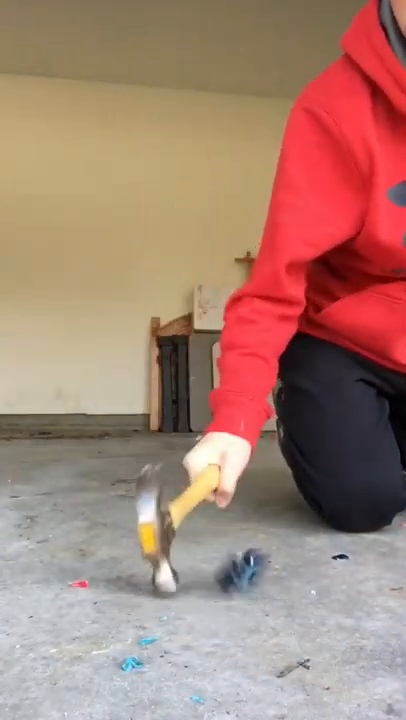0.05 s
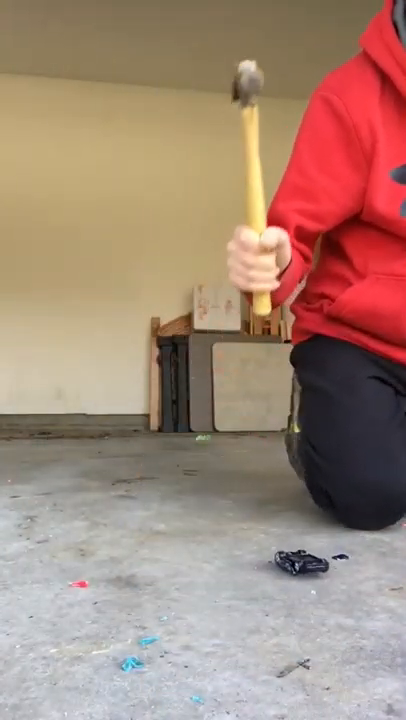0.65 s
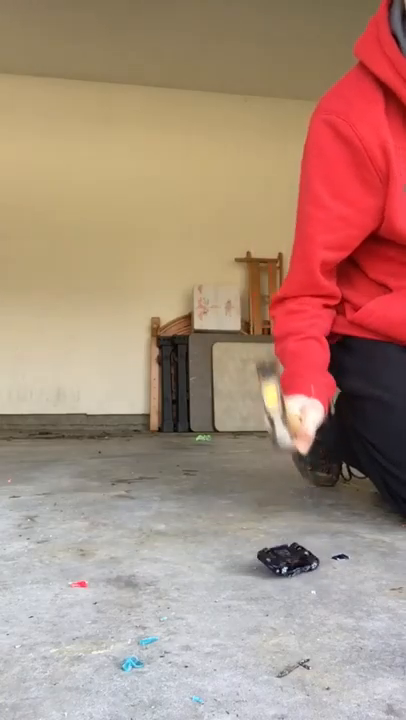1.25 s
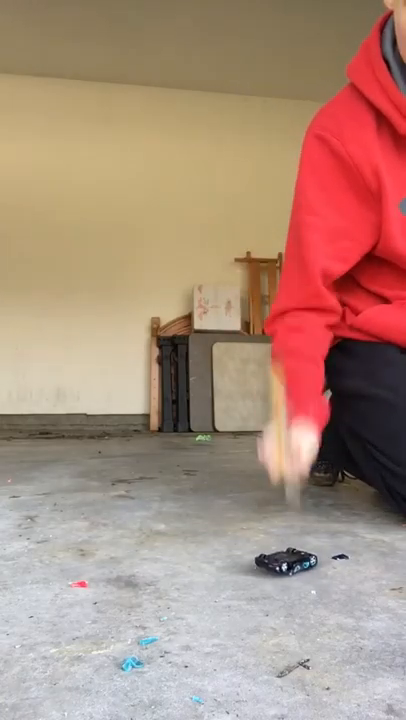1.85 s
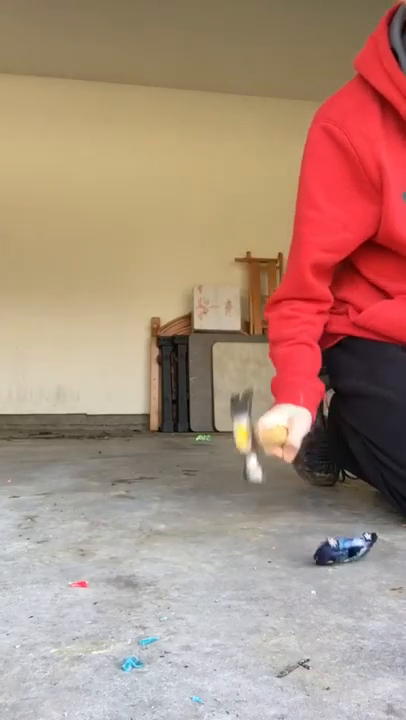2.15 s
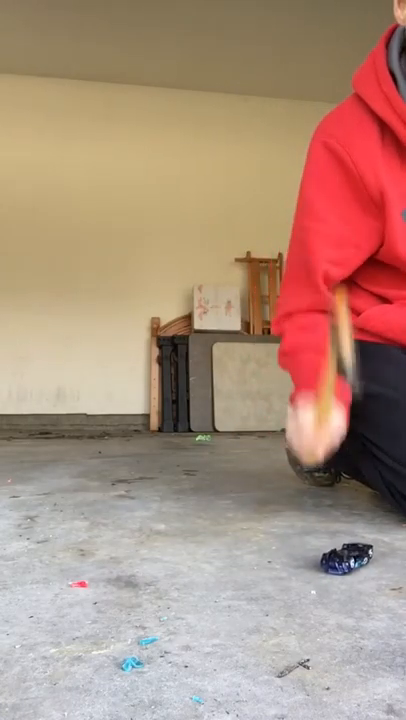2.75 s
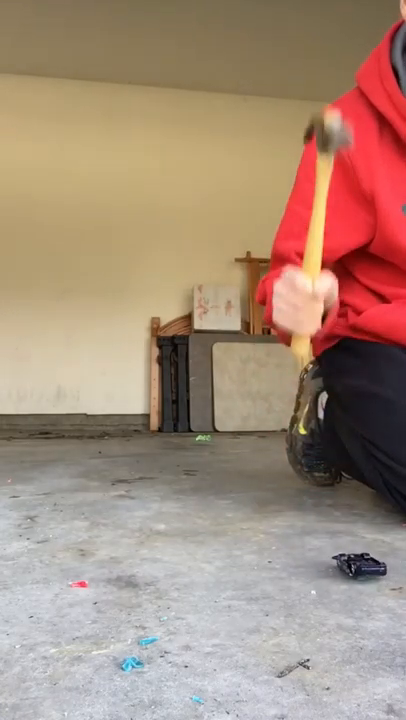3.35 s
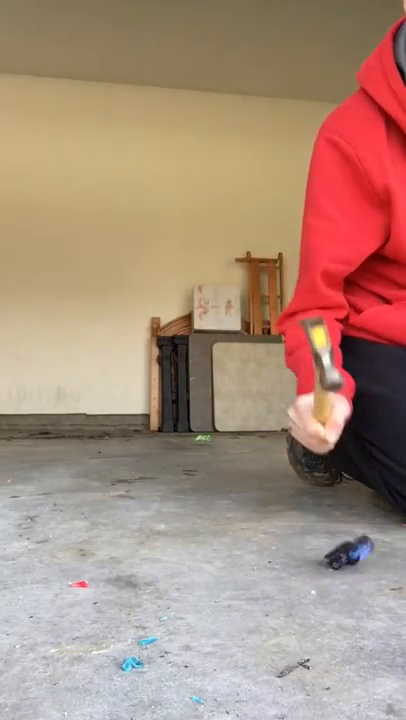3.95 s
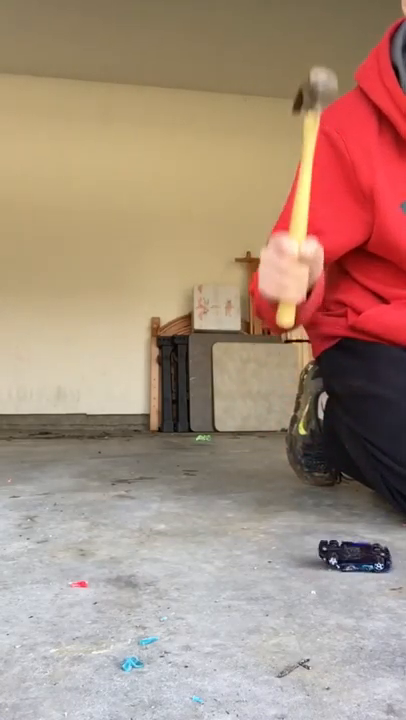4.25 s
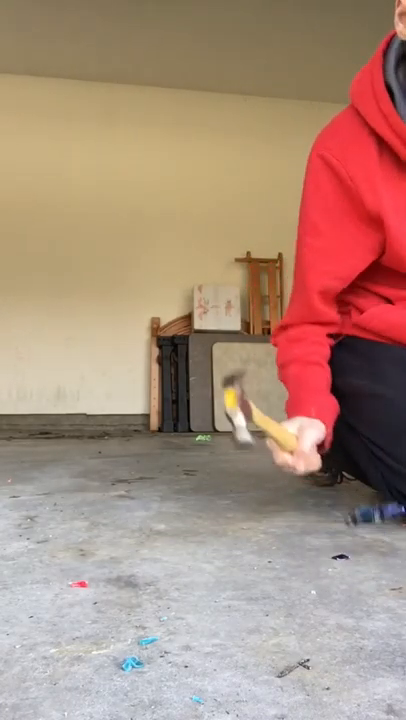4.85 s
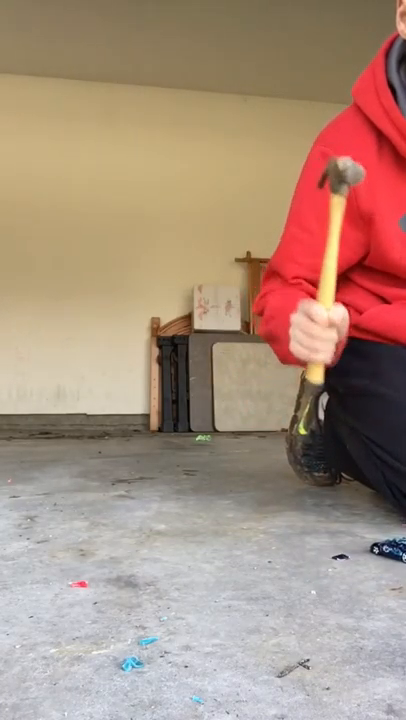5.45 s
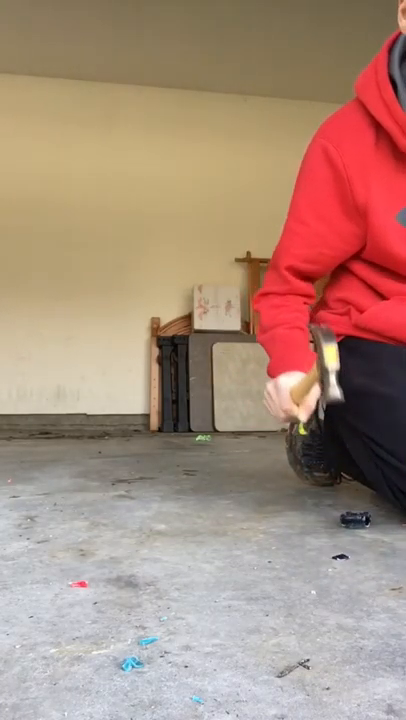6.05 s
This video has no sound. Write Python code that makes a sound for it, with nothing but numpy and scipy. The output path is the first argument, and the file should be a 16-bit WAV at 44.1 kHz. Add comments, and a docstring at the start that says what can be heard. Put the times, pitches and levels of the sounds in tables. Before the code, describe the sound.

A hammer smashes a small metal toy car on concrete about once a second, the car clattering after each blow in an echoing garage.

```python
"""A claw hammer smashes a die-cast toy car on a concrete garage floor, about one blow a second.
Each blow cracks twice as the shell gives way, throws splinters and thumps the slab; the car leaps,
lands and rattles to rest. The bare garage booms and rings on. Behind it, a sleeve rustles and a
faint rumble comes through the open door. Heard in mono on a phone close by, which limits the peaks."""
import sys
import numpy as np
from scipy import signal
from scipy.fft import rfft, irfft, next_fast_len
from scipy.io import wavfile
from scipy.ndimage import uniform_filter1d, minimum_filter1d

SR = 44100
rng = np.random.default_rng(int(sys.argv[2]) if len(sys.argv) > 2 else 0)


def unload_audio(sound):
    """Save the sound as a 16-bit wav file, at the path given as the first command line argument."""
    columns = np.transpose(np.atleast_2d(sound))
    # keep every value between -1 and 1, then stretch to whole-number steps
    steps = np.round(np.clip(columns, -1, 1) * 32767)
    wavfile.write(sys.argv[1], SR, steps.astype(np.int16))


N = 272979

# distant outdoor rumble and air: (frequency [Hz], relative level [dB])
OUTDOOR_SPECTRUM = [(12, -54), (20, -38), (51, -3), (71, 0), (140, -7.5), (166, -13.5), (387, -24.5),
                    (1300, -34.5), (1540, -28), (1990, -30.5), (2430, -33.5), (4390, -32.5), (4910, -34),
                    (17000, -55)]
# standing waves of the garage: (frequency [Hz], relative level [dB], t60 [s])
ROOM_MODES = [(55, -5.5, .35), (85, -8.5, 0.61), (122, -2.5, 0.19), (157.4, 2, 1), (236.8, -5.5, 0.9),
              (274, -17.5, 0.41), (368, -5.5, 0.92), (534, -4.5, 0.27)]
# colour of the diffuse tail: (frequency [Hz], gain [dB])
TAIL_SPECTRUM = [(40, 1), (120, 8), (300, 0), (700, -1), (1500, -5.5), (4000, -7), (8000, -6), (16000, -5)]
# late decay of that tail: (frequency [Hz], t60 [s])
TAIL_DECAY = [(60, 0.21), (160, 0.72), (400, 0.93), (1100, 1.404), (2000, 1.07), (4000, 0.83), (8000, 0.65),
              (15000, 0.42)]
# first reflections off the body, ceiling and walls: (delay [s], gain [dB])
REFLECTIONS = [(.0088, -47.5), (.0183, -40.5), (0.0296, -25), (0.039, -23.5)]
# a sleeve on the swinging arm: (time [s], length [s], level [dB], starting lag of its reflection [s])
SLEEVE_SWINGS = [(3.494, 0.96, -63.5, 0.00022), (4.607, 0.54, -62, 0.00064), (5.578, 0.41, -71, 0.00015)]
# the kneeling body shifts: (time [s], level [dB])
KNEE_BUMPS = [(0.914, -34.5), (0.966, -38.5)]
# metal striking concrete: (frequency [Hz], gain [dB])
CRACK_SPECTRUM = [(150, -16), (700, -15.5), (1500, -14), (2300, -8.5), (3200, 0), (4500, -0.5),
                  (6200, -1.5), (8000, -8), (10500, -12.5), (15000, -13), (18000, -24.5)]
# the car's struck shell: (frequency [Hz], relative level [dB], t60 [s])
SHELL_MODES = [(1376, -20.5, 0.056), (2680, -18, 0.069), (3035, -6, .035), (3150, -13, .03),
               (4230, -8, .03), (4480, -2.5, 0.045), (4580, -5, 0.0094), (5550, 6, 0.0092),
               (6395, -6, 0.027), (6200, -11, .018), (7200, -17, .025), (7320, -1.5, 0.022),
               (7900, -3.5, 0.013), (8860, 3, 0.0074), (11500, -12.5, 0.029)]
# the chassis, fainter and longer: (frequency [Hz], relative level [dB], t60 [s])
CHASSIS_MODES = [(2870, -8.5, .25), (4450, -2, 0.25), (4680, -3, .22), (5370, 1.5, .18), (5860, -5, 0.22)]
# the bent shell ringing in flight: (frequency [Hz], relative level [dB], t60 [s])
FLIGHT_MODES = [(5207, 0, 1.1), (6222, -5, .8)]
# thin parts of the car ring on: (time [s], frequency [Hz], level [dB], t60 [s])
SHIMMERS = [(-0.03, 3280, -23.5, 0.42), (1.443, 7700, -43.5, 0.4), (1.975, 6470, -34.5, 0.53),
            (2.8455, 7850, -58, 0.22), (3.875, 3560, -18, 0.85), (4.61, 7560, -43, 0.45),
            (5.744, 2060, -20.5, 0.087), (6.04, 7000, -38, 0.46)]
# the car lands on a corner: (time [s], level [dB], ring [Hz], treble [dB])
CAR_LANDINGS = [(.0412, -21.5, 3140, -8.5), (.1316, -27.5, 4240, -6.5), (.145, -11.5, 5220, -12),
                (0.2281, -24, 6080, -20.5), (0.2552, -19, 5910, -11.5), (.275, -24, 4540, -2),
                (.344, -26, 5110, -14.5), (0.3683, -12.5, 5330, -15), (.455, -22.5, 6040, -3.5),
                (0.4783, -29.5, 4620, -18), (0.5264, -28.5, 4540, -14.5), (0.586, -32, 5380, -8.5),
                (0.6645, -37, 4500, -15.5), (1.1377, -24.5, 4510, -4), (1.3081, -18, 4590, -7.5),
                (1.335, -27.5, 4410, -9.5), (1.4422, -29.5, 4450, -4.5), (1.565, -40, 4660, -11),
                (2.2761, -18, 4350, -13.5), (2.312, -24, 4290, -1), (2.3953, -22.5, 4700, -12.5),
                (2.4377, -33, 4580, 0.5), (2.4717, -33, 4740, -4.5), (2.613, -48, 4550, -9.5),
                (2.7017, -48.5, 4520, -21), (2.8453, -42.5, 4540, -9), (3.234, -24, 4480, -9.5),
                (3.3447, -39, 4690, -12.5), (4.0192, -24, 4520, 2), (4.034, -22.5, 3700, 4),
                (4.2043, -23.5, 5400, 5), (4.2125, -22.5, 5290, 0), (4.269, -25, 4430, -16),
                (4.344, -29, 4320, -5), (4.4455, -35.5, 4420, -16.5), (4.48, -36, 5220, -11.5),
                (4.612, -36, 7530, 2), (4.7102, -50.5, 4280, -16), (5.016, -14, 5120, -4.5),
                (5.0286, -15, 4260, 4), (5.0669, -18.5, 4510, 0.5), (5.1388, -26, 3640, 3),
                (5.1747, -29, 7560, 10), (5.875, -19.5, 4510, -8), (5.951, -24.5, 4600, -5),
                (5.9625, -26.5, 4090, 3), (6.0407, -24.5, 4280, -12), (6.067, -30.5, 4450, -6)]
# the car's loose wheels and edges chatter as it tumbles, in the air or along the floor:
# (time [s], length [s], first tick [dB], chatter [dB])
CAR_TUMBLES = [(.198, 0.088, -39, -37.5), (0.423, 0.24, -41, -60), (.764, .04, -59.5, -54),
               (1.522, .17, -39.5, -66.5), (2.143, .04, -27.5, -44.5), (2.294, 0.074, -29.5, -41),
               (2.402, 0.14, -34.5, -59), (3.077, .06, -22.5, -46), (3.311, .03, -39, -56.5),
               (4.191, 0.06, -31, -41), (4.293, 0.13, -35, -51), (4.49, .11, -36, -53.5),
               (5.112, 0.091, -26.5, -42), (5.943, .22, -31, -51)]
# the hammer's handle and head: (frequency [Hz], relative level [dB], t60 [s])
HAMMER_MODES = [(565, -9.5, 0.011), (1670, 2, 0.0077), (1910, 0.5, 0.0072), (4000, -9, .012)]
# the hammer clips the leaping car: (time [s], knock [dB], ring [dB], time in the air [s])
GLANCING_HITS = [(3.0395, -15.5, -31, 0.18)]
# the slab heaves under the hammer: (frequency [Hz], relative level [dB], decay time [s])
SLAB_MODES = [(56, -12, .07), (92, 0.5, 0.037)]
# hammer blows, levels before the mix: (time [s], crack [dB], ring [Hz], handle [dB], treble [dB],
# delay until the shell bottoms out [s], second crack [dB], thump [dB], hollow body [dB])
HAMMER_BLOWS = [(-0.035, -10, 3200, -27.5, -1.5, 0.0044, -13, -17, -29),
                (1.0328, -8.5, 4450, -23.5, -2, 0.0039, -13, -17, -29),
                (1.9649, -6.5, 6010, -24.5, 0, .004, -22.5, -18, -30),
                (2.9162, -4.5, 3890, -47, -5, .013, -17, -18, -29),
                (3.8631, -9.5, 3630, -50.5, 0, 0.0028, -12, -16.5, -31),
                (4.8150, -10.5, 4000, -31.5, -1, .0033, -13.5, -13, -21),
                (5.7417, -9, 4930, -34.5, -2, 0.0041, -16, -14.5, -27)]

LEAD_S = .1  # tracks begin this long before time zero
HIT_SIZE = 2048  # samples in one contact


def undb(db):
    """Decibels to gain."""
    return 10 ** (np.asarray(db) / 20)


def fade(t, t60):
    """Exponential decay, 60 dB down at t60."""
    return np.exp(-np.log(1000) * t / max(t60, 1e-4))


def along(hz, points):
    """Read (frequency [Hz], value) points on a log-frequency axis."""
    f, value = np.transpose(points)
    return np.interp(np.log(np.maximum(hz, 1)), np.log(f), value)


def colour(x, db_at):
    """Minimum-phase filter whose gain in dB is a function of frequency."""
    n = 2 * next_fast_len(len(x))
    cepstrum = irfft(np.log(undb(db_at(np.arange(n // 2 + 1) * SR / n))))
    cepstrum[1:n // 2] *= 2
    cepstrum[n // 2 + 1:] = 0
    return irfft(rfft(x, n) * np.exp(rfft(cepstrum)))[:len(x)]


def at_level(x, db):
    """Scale a hit so that its energy, spread over 5 ms, has this level."""
    return x * undb(db) / np.sqrt(np.sum(x ** 2) / (.005 * SR))


def add(track, s, x):
    """Mix a sound into a track at time s, allowing for the lead-in."""
    i = max(int((s + LEAD_S) * SR), 0)
    track[i:i + len(x)] += x[:max(len(track) - i, 0)]


def ring(modes, seconds):
    """Struck modes dying away."""
    t = np.arange(int(seconds * SR)) / SR
    return sum(undb(db) * np.sin(2 * np.pi * hz * t) * fade(t, t60) for hz, db, t60 in modes)


def burst(t, t60, spectrum):
    """Dying noise, coloured by (frequency [Hz], gain [dB]) points."""
    return colour(rng.standard_normal(len(t)) * fade(t, t60), lambda f: along(f, spectrum))


def outdoor_air(level_db=-55.5, swell_db=1.4):
    """Distant rumble through the open door, dull in the treble and slowly swelling."""
    treble_dip = [(3500, -1.5), (5000, -8), (10000, -2.5), (16000, 1)]
    air = colour(rng.standard_normal(N), lambda f: along(f, OUTDOOR_SPECTRUM) + along(f, treble_dip))
    swell = np.interp(np.arange(N), np.linspace(0, N, num=20), rng.standard_normal(20))
    return air / np.std(air) * undb(level_db + swell_db * swell)


def garage(x, wet_db):
    """The bare room returns a few distinct reflections, then a diffuse tail, longest in the mids."""
    t = np.arange(int(1.5 * SR)) / SR
    f = np.arange(len(t) // 2 + 1) * SR / len(t)
    noise = rfft(rng.standard_normal(len(t))) * undb(along(f, TAIL_SPECTRUM))
    centres_hz, t60s = np.transpose(TAIL_DECAY)
    tail = 0
    for share, t60 in zip(np.eye(len(t60s)), t60s):
        band = irfft(noise * along(f, np.c_[centres_hz, share]), len(t))
        tail += band * (fade(t, t60) + .78 * fade(t, .55 * t60))  # the early sound escapes faster
    build_up = 1 - fade(t, .017)
    response = tail * build_up * undb(wet_db) / np.sqrt(.1 * SR)
    for delay, db in REFLECTIONS:
        response[int(delay * SR)] += undb(db)
    return signal.fftconvolve(x, response)[:len(x)]


def sleeve_and_knee(size, lag_growth_s_per_s=.0016):
    """Close and dry: cloth rustle, combed by a reflection off the moving arm, and soft knee bumps."""
    out = np.zeros(size)
    cloth_spectrum = [(500, -15), (1700, 32.5), (3800, 38.5), (6000, -68.5), (12000, -44.5)]
    bump_spectrum = [(40, -24.5), (90, 3), (250, -17), (700, -47.5), (3000, -65)]
    for s, length, db, lag_s in SLEEVE_SWINGS:
        i = np.arange(int(length * SR))
        cloth = colour(rng.standard_normal(len(i)), lambda f: along(f, cloth_spectrum))
        # the reflection's lag grows, so the swish falls in pitch
        lag = SR * lag_s + lag_growth_s_per_s * i
        for _ in range(2):
            cloth = cloth - np.interp(i - lag, i, cloth)
        add(out, s, undb(db) * cloth / np.std(cloth) * np.sqrt(np.hanning(len(i))))
    t = np.arange(4 * HIT_SIZE) / SR
    for s, db in KNEE_BUMPS:
        add(out, s, at_level(burst(t, .1, bump_spectrum), db))
    return out


def contact(db, ring_hz, treble_db, knock_db, crack_t60, shell_db, focus_db, low_db):
    """Metal on concrete: a gritty crack and the shell's modes, weighted by where the car is hit."""
    t = np.arange(HIT_SIZE) / SR
    crack = burst(t, crack_t60, CRACK_SPECTRUM)
    shell = 0
    for hz, mode_db, t60 in SHELL_MODES:
        loud, detune, phase = rng.standard_normal(3)
        cycles = hz * (1 + .024 * detune) * t + phase
        shell += undb(mode_db + 3.6 * loud) * np.sin(2 * np.pi * cycles) * fade(t, t60)
    build_up = 1 - fade(t, .0035)
    hit = (at_level(crack, 0) + at_level(shell, shell_db)) * build_up
    tilt = [(600, knock_db + low_db), (1800, knock_db - 3.5), (3000, .0049), (6000, .015),
            (11000, treble_db)]
    width_hz = .12 * ring_hz  # the struck corner favours one band
    hit = colour(hit, lambda f: along(f, tilt) + focus_db * np.exp(-((f - ring_hz) / width_hz) ** 2))
    return at_level(hit, db)


def tumbles(size, tick_gap_s=.049, tick_hz=4600, settle_db=9):
    """Loose wheels and edges tick and chatter ever more softly, in the air or along the floor."""
    out, t = np.zeros(size), np.arange(8 * HIT_SIZE) / SR
    chatter_tilt = [(1000, -2.5), (3500, -4), (7000, -6.5), (12000, -9.5)]
    for s, length, tick_db, chatter_db in CAR_TUMBLES:
        age = 0
        for gap, loud, pitch in rng.standard_normal((7, 3)):
            db = tick_db - settle_db * age / length + 2.5 * loud
            tick = contact(db, tick_hz * np.exp(.09 * pitch), treble_db=-9.5, knock_db=-6.5,
                           crack_t60=.0054, shell_db=-1, focus_db=8, low_db=-.5)
            add(out, s + age, (age < length) * tick)
            age += tick_gap_s * np.exp(.17 * gap)
        # dense tiny collisions, a few much larger than the rest
        chatter = rng.standard_normal(len(t)) ** 3 * (rng.random(len(t)) < .3)
        chatter *= (t < length) * undb(-settle_db * t / length)
        chatter = colour(chatter, lambda f: along(f, CRACK_SPECTRUM) + along(f, chatter_tilt))
        rms = np.sqrt(np.sum(chatter ** 2) / (length * SR) + 1e-18)
        add(out, s, undb(chatter_db) * chatter / rms)
    return out


def landing(db, hz, treble_db, slap_db=-14.5):
    """One corner strikes the concrete, then the wheels slap down a few milliseconds later."""
    out = np.zeros(2 * HIT_SIZE)
    knock_db = -1.5 - .4 * treble_db  # a blunt landing knocks more than a sharp one
    tone = (hz, treble_db, knock_db)
    lag = int(rng.uniform(.0034, .0134) * SR)
    corner = contact(db, *tone, crack_t60=.014, shell_db=-2.5, focus_db=6.5, low_db=-5)
    wheels = contact(db + slap_db, *tone, crack_t60=.01, shell_db=-2, focus_db=1.5, low_db=1)
    out[:HIT_SIZE] += corner
    out[lag:lag + HIT_SIZE] += wheels
    return out


def toy_car(size, shimmer_width_hz=110, chassis_db=-70.5):
    """The car tumbles and lands near the microphone; its thin parts and chassis ring on."""
    out, t = tumbles(size), np.arange(8 * HIT_SIZE) / SR
    for s, db, hz, treble_db in CAR_LANDINGS:
        add(out, s, landing(db, hz, treble_db))
    for s, hz, db, t60 in SHIMMERS:
        noise = rng.standard_normal(len(t)) * fade(t, t60)
        shimmer = colour(noise, lambda f: np.maximum(-((f - hz) / shimmer_width_hz) ** 2, -60))
        add(out, s, at_level(shimmer, db))
    chassis = signal.oaconvolve(out, ring(CHASSIS_MODES, seconds=.3))[:size]
    return out + undb(chassis_db) * chassis


def glancing_hit(size):
    """A dull knock of the hammer's head; the airborne shell rings until the floor chokes it."""
    out, t = np.zeros(size), np.arange(SR) / SR
    for s, knock_db, ring_db, flight_s in GLANCING_HITS:
        knock = ring(HAMMER_MODES, seconds=1) * (1 - fade(t, .01))
        choke = fade(np.maximum(t - flight_s, 0), .034)
        add(out, s, at_level(knock, knock_db))
        add(out, s, undb(ring_db) * ring(FLIGHT_MODES, seconds=1) * choke)
    return out


def hammer_thumps(size, start_hz=229, rise_hz_per_s=11.2, body_hz=530, lag_s=.0025):
    """The hammer's weight meets the slab: a few low cycles, and a hollow note of the crushed body."""
    out, t = np.zeros(size), np.arange(2 * HIT_SIZE) / SR
    low_cut = signal.butter(2, 42, "highpass", fs=SR, output="sos")
    shudder_spectrum = [(30, -8), (60, -2.5), (150, .5), (250, 1.5), (350, 2), (420, -11.5),
                        (800, -30.5), (3000, -58.5)]
    heave = t * sum(undb(db) * np.sin(2 * np.pi * hz * t) * fade(t, t60) for hz, db, t60 in SLAB_MODES)
    body = np.sin(2 * np.pi * body_hz * t) * t * fade(t, .016)
    for s, *_, thump_db, body_db in HAMMER_BLOWS:
        hz = start_hz + rise_hz_per_s * s  # the flattened car cushions less, so the pitch climbs
        push = np.sin(2 * np.pi * hz * t) * t ** 2 * fade(t, .0097)
        shudder = burst(t, .13, shudder_spectrum)
        low = signal.sosfilt(low_cut, at_level(push, 0) + at_level(heave, -6) + at_level(shudder, -9))
        add(out, s + lag_s, at_level(low, thump_db) + at_level(body, body_db))
    return out


def hammer_cracks(size, splinter_db=-13):
    """Each blow cracks the shell, bottoms out on the floor, rings the handle and scatters splinters."""
    out = np.zeros(size)
    for s, db, hz, handle_db, treble_db, delay, second_db, *_ in HAMMER_BLOWS:
        first = contact(db, hz, treble_db, knock_db=0,
                        crack_t60=.0097, shell_db=-14, focus_db=4.5, low_db=1.5)
        second = contact(second_db, hz, treble_db, knock_db=13,
                         crack_t60=.0096, shell_db=-25, focus_db=4.5, low_db=-3)
        add(out, s, first)
        add(out, s + delay, second)
        add(out, s + delay, at_level(ring(HAMMER_MODES, seconds=.04), handle_db))
        for late, soft in rng.random((4, 2)):
            splinter = contact(db + splinter_db - 6 * soft, hz, treble_db, knock_db=0,
                               crack_t60=.015, shell_db=-9.5, focus_db=.5, low_db=-6.5)
            add(out, s + .01 + .055 * late ** 2, splinter)  # thinning out from 10 to 65 ms
    return out


def scene():
    """At the microphone: the blows fill the whole garage; the small landings stay close and drier."""
    lead = int(LEAD_S * SR)
    size = N + lead
    thumps, car, glance = hammer_thumps(size), toy_car(size), glancing_hit(size)
    boom = signal.fftconvolve(thumps, undb(-56.5) * ring(ROOM_MODES, seconds=.87))[:size]
    # the breaking shell sends a different crack towards each wall
    walls = sum(garage(hammer_cracks(size) + undb(.16) * thumps, wet_db=-5.5) for _ in range(3))
    room = walls + boom + garage(car + glance, wet_db=-7.5)
    direct = undb(-2.5) * hammer_cracks(size) + thumps + car + glance + sleeve_and_knee(size)
    return ((direct + room)[lead:] + outdoor_air())[None]


def record(dry):
    """The nearby phone: its limiter holds the peaks around full scale, and the very top is cut."""
    ceiling, window_samples, top_hz = 1.05, 65, 17900
    gain = np.minimum(1, ceiling / (np.abs(dry) + 1e-9))
    gain = uniform_filter1d(minimum_filter1d(gain, window_samples), window_samples)
    high_cut = signal.ellip(8, .2, 70, top_hz, fs=SR, output="sos")
    return signal.sosfilt(high_cut, dry * gain)


dry = scene()
out = record(dry)
unload_audio(out)
```